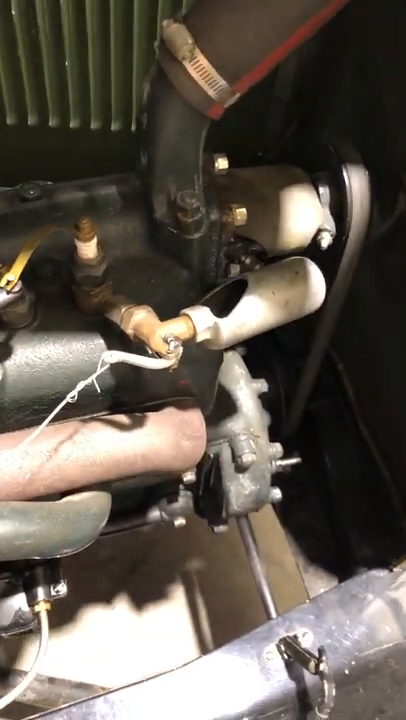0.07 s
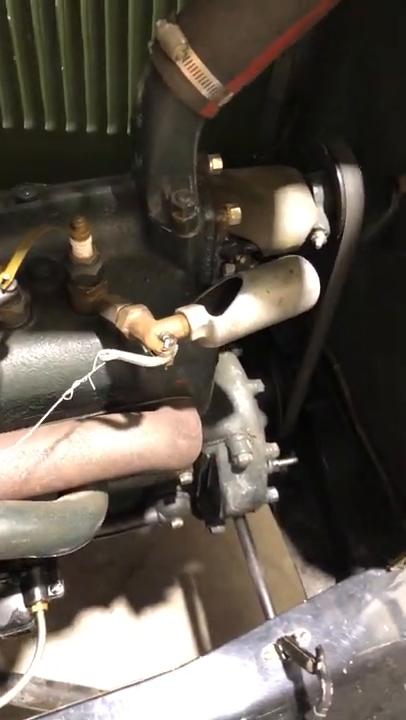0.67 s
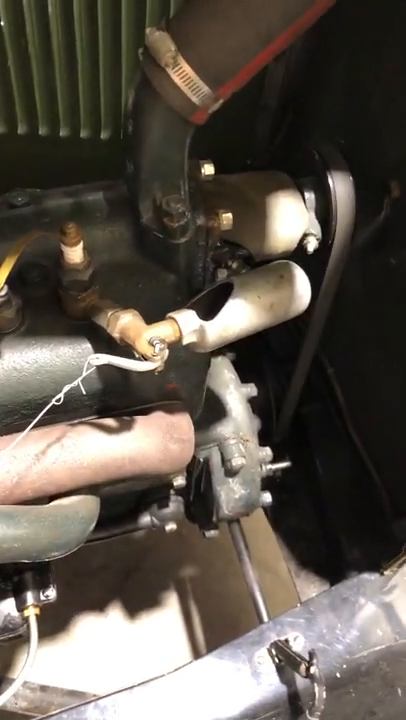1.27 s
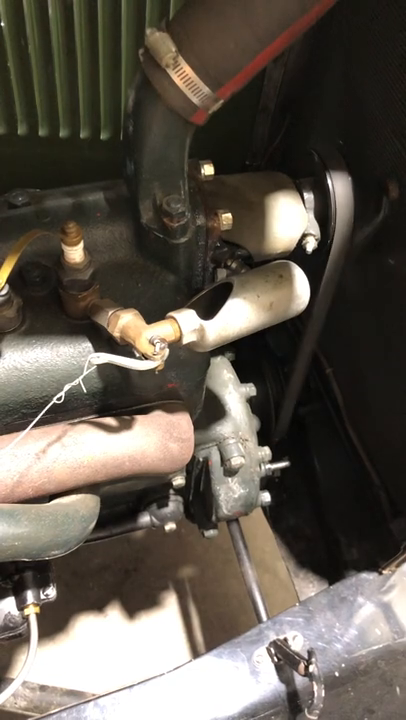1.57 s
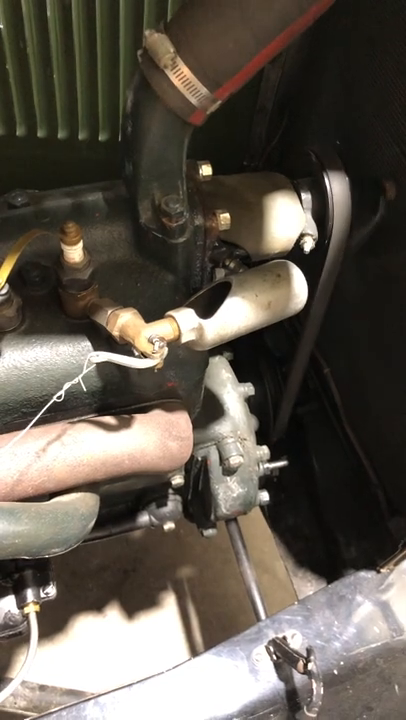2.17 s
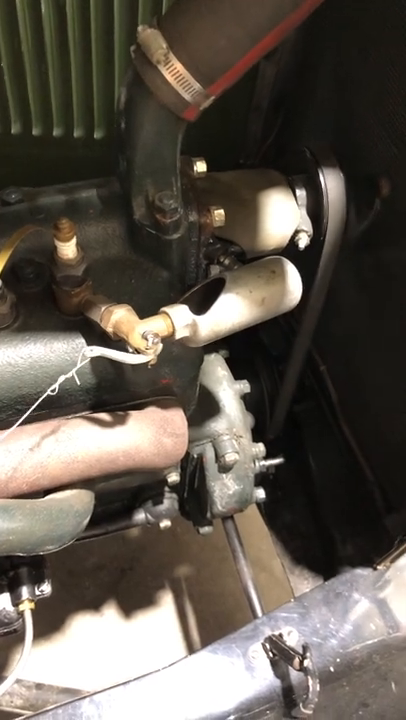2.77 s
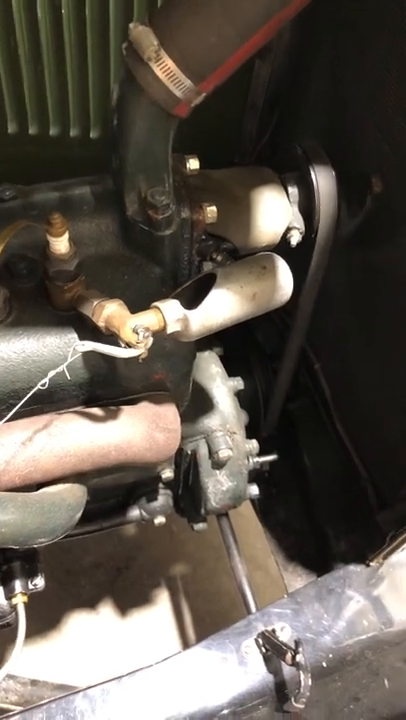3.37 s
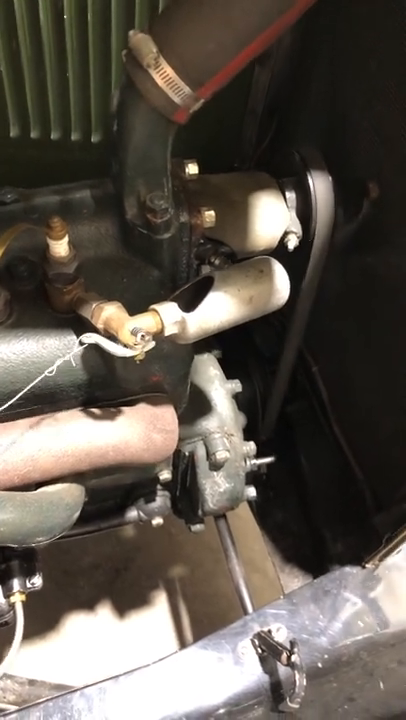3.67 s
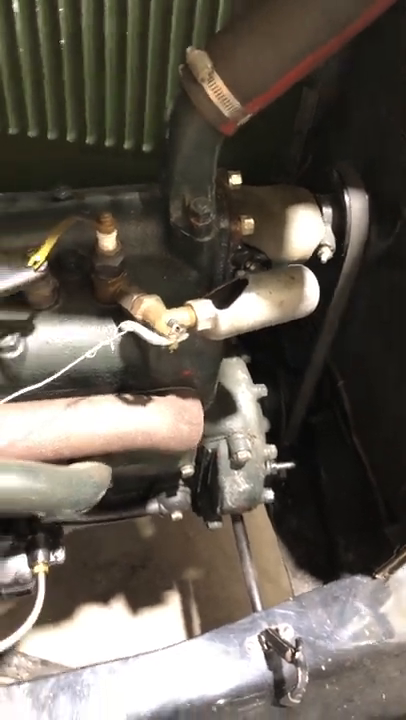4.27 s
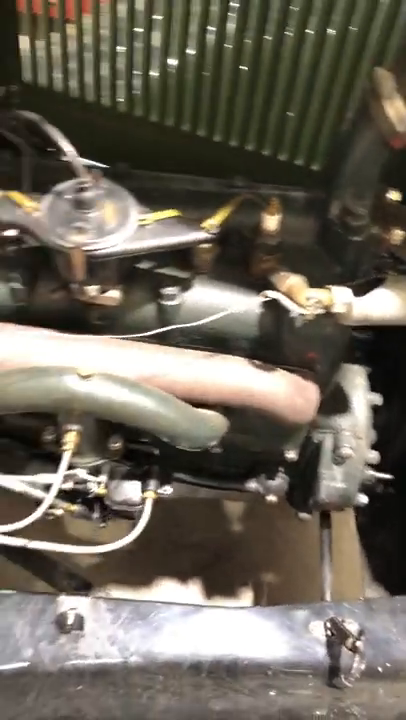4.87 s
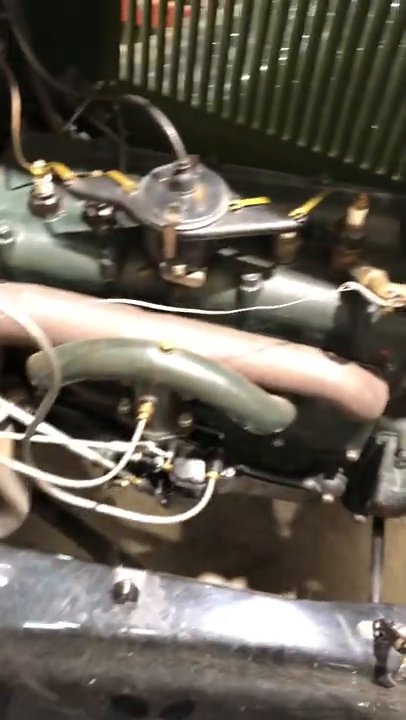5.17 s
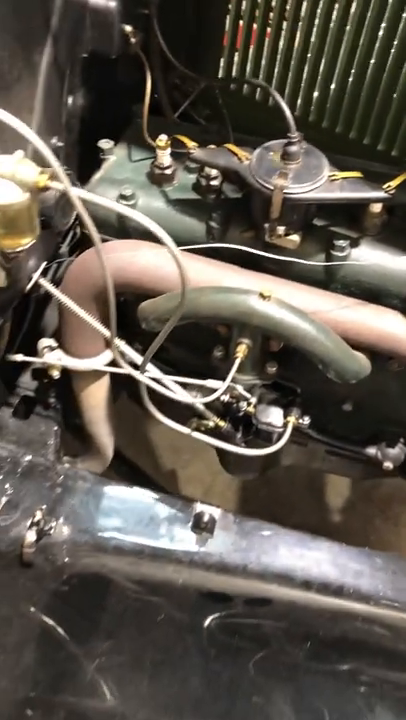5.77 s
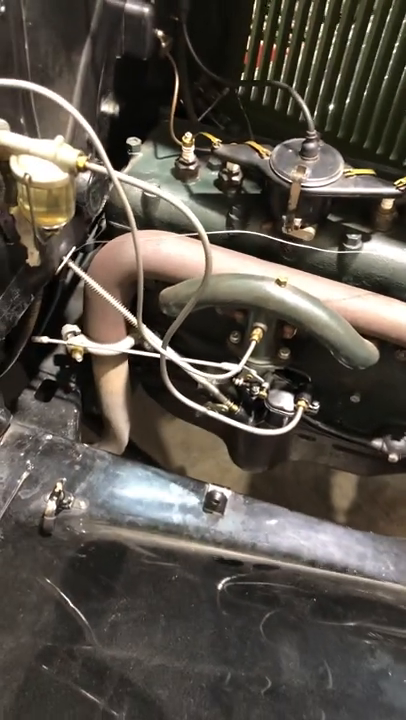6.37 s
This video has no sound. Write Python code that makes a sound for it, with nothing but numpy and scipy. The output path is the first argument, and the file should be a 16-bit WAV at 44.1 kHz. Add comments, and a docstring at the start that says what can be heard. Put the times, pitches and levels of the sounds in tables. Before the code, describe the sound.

Rapid, piercing toots, each with a spit of hiss, come from a whistle on an idling old car engine and ring briefly around a garage. Low thuds and light ticking run underneath. After about three and a half seconds the toots cut off, and the engine carries on a touch quicker, whirring and clacking, growing louder at the close microphone.

```python
"""An old four-cylinder car engine idles in a garage, with a compression whistle screwed into one cylinder. At
first that cylinder blows a hissing toot once every engine cycle, and the walls throw it back. At 3.6 seconds
the whistle's valve is shut. The engine thuds and ticks on, a little faster, and two of the tappet ticks in each
cycle knock out loudly. The clatter swells as the close microphone moves along the engine and the automatic
volume control, no longer held down by the toots, turns back up."""
import sys
import numpy as np
from scipy import signal
from scipy.fft import rfft, irfft
from scipy.io import wavfile
from scipy.ndimage import uniform_filter1d, minimum_filter1d

SR = 44100
rng = np.random.default_rng(int(sys.argv[2]) if len(sys.argv) > 2 else 0)


def materialize(psi):
    """Save the field psi as 16-bit PCM at rate SR to the path in sys.argv[1].

    A 1-D psi becomes a single channel; in a 2-D psi each row is a channel.
    """
    bounded = np.clip(np.atleast_2d(psi).T, -1, 1)
    quanta = np.round(bounded * 32767).astype(np.int16)
    wavfile.write(sys.argv[1], SR, quanta)


N = 287973
T = np.arange(N) / SR
VALVE_SHUT_S = 3.6  # the whistle stops here
# The tone of metal hitting metal. Each row: frequency in Hz, relative level in dB.
METAL_TONE = [(500, -2.5), (1500, -5.5), (2600, -3), (4000, 2.5), (5200, 0), (7500, -0.5), (9500, -0.5),
              (11500, -5.5), (15800, -10)]


def undb(db):
    """Turn decibels into a number to multiply by."""
    return 10 ** (np.asarray(db) / 20)


def add(out, start_s, x):
    """Mix x into out, beginning at start_s."""
    i = int(round(start_s * SR))
    a, b = max(i, 0), min(i + len(x), len(out))
    if b > a:
        out[a:b] += x[a - i:b - i]


def colour(x, tone, peaks=()):
    """Give x a smooth tone curve with ringing peaks on top, at an average (rms) level of 1."""
    f = np.fft.rfftfreq(len(x), 1 / SR) + 1e-3
    hz, db = np.transpose(tone)
    gain = undb(np.interp(np.log(f), np.log(hz), db)) / np.sqrt(1 + (20 / f) ** 4)
    for centre, width, rise in peaks:
        gain = gain * (1 + (undb(rise) - 1) / np.sqrt(1 + (2 * (f - centre) / width) ** 4))
    shaped = irfft(rfft(x) * gain, len(x))
    return shaped / np.sqrt(np.mean(shaped ** 2))


def noise(tone, peaks=()):
    """Steady noise with the given tone."""
    return colour(rng.standard_normal(N), tone, peaks)


def bursts(times, levels_db, rise_s, fall_s, hold_s=0):
    """A loudness curve that peaks at each given time, holds and dies away."""
    t = np.arange(-SR // 50, SR // 10) / SR
    shape = np.exp(np.minimum(t / rise_s, -np.maximum(t - hold_s, 0) / fall_s))
    power = np.zeros(N)
    for s, db in zip(times, levels_db):
        add(power, s + t[0], (undb(db) * shape) ** 2)
    return np.sqrt(power)


def cycle_starts():
    """The start time of every engine cycle: the idle drifts a little, then quickens."""
    # The turning crankshaft. Each row: time in seconds, cycles since the first toot.
    crank = [(-.0495, 0), (.9445, 7), (1.368, 10), (1.513, 11), (2.247, 16), (2.397, 17), (2.6915, 19),
             (3.56, 25), (4.003, 28), (5.585, 39), (6.698, 47)]
    s, cycles = np.transpose(crank)
    return np.interp(np.arange(cycles[-1] + 1), cycles, s)


def strokes(starts, place):
    """The times when the engine passes one place (0 to 1) in its cycle."""
    return starts[:-1] + place * np.diff(starts)


def garage(x, tail_db=-25.0, die_away_s=1.24, build_s=0.088):
    """The sound arrives directly, then as a few echoes, then as a blurred tail."""
    # Echoes off bonnet, floor and walls. Each row: delay in seconds, level in dB.
    echoes = [(.007822, -23), (.011752, -24), (.013049, -21), (.022528, -22), (.046608, -23.5),
              (.084012, -38)]
    t = np.arange(SR) / SR
    tail = colour(rng.standard_normal(SR), [(100, 17), (1000, 3.0), (5000, -8), (15000, -23.5)])
    tail = tail * undb(-60 * t / die_away_s) * (1 - np.exp(-(t / build_s) ** 4))
    response = undb(tail_db) * tail / np.sqrt(np.sum(tail ** 2))
    response[0] += 1  # the direct sound
    for delay_s, db in echoes:
        response[int(round(delay_s * SR))] += undb(db)
    return signal.fftconvolve(x, response)[:len(x)]


def rumble(starts, rumble_db=-48.5, ring_s=0.033, push_s=0.0031, scatter=1.26):
    """Four thuds a cycle shake the engine block and car body, over a low hum."""
    # The cylinders. Each row: place in the cycle, relative dB with the whistle open, then with it shut.
    cylinders = [(.03, 0, 4.5), (.28, -0.5, 1.5), (.55, 0.5, 1), (.78, 1, 0)]
    # The engine's hum. Each row: vibrations per cycle, level in dB.
    hum_tones = [(8, -70.5), (12, -66)]
    # The deep tone of the thuds. Each row: frequency in Hz, relative level in dB.
    thud_tone = [(25, -24), (50, -17), (75, -1), (108, -2), (160, -0.5), (235, -2), (290, 1), (400, -5.5),
                 (550, -19.5), (780, -21), (1300, -70)]
    # Ringing of block and body panels. Each row: frequency in Hz, width in Hz, boost in dB.
    body_peaks = [(137, 18, 1.5), (188, 46, 4.5), (326, 31, 4)]
    t = np.arange(SR // 6) / SR
    shape = np.exp(-t / ring_s) * (1 - np.exp(-t / push_s))
    thuds = np.zeros(N)
    for place, open_db, shut_db in cylinders:
        own_thud = rng.standard_normal(len(t))  # each cylinder has its own sound
        for s in strokes(starts, place):
            db = open_db if s < VALVE_SHUT_S else shut_db
            add(thuds, s, undb(db) * shape * (own_thud + scatter * rng.standard_normal(len(t))))
    phase = 2 * np.pi * np.interp(T, starts, np.arange(len(starts)))
    hum = sum(undb(db) * np.sqrt(2) * np.sin(round(k) * phase + rng.uniform(0, 2 * np.pi))
              for k, db in hum_tones)
    return undb(rumble_db) * colour(thuds, thud_tone, body_peaks) + hum


def rattle(starts, whirr_db=-47.0, tappet_db=-2, scatter_db=3.0, grain_db=2.5):
    """Tappets, the parts that push the valves, tick over the grainy whirr of gears, belt and fan."""
    # The ticks. Each row: place in the cycle, relative level in dB.
    tappets = [(0.037, -40.5), (.31, -43), (0.553, -40), (0.796, -38)]
    # The tone of the whirr. Each row: frequency in Hz, relative level in dB.
    whirr_tone = [(260, -23), (450, -5), (804, 2.5), (1050, -3.5), (1170, -1.5), (1370, -3), (1720, 0.5),
                  (1970, -5.5), (3960, -5), (4950, -9.5), (8450, -10), (10700, -15.5), (15100, -14),
                  (15800, -33)]
    times = np.concatenate([strokes(starts, place) for place, _ in tappets])
    levels = np.repeat([db for _, db in tappets], len(starts) - 1)
    levels = levels + scatter_db * rng.standard_normal(len(times))
    ticks = bursts(times, levels + tappet_db, rise_s=0.0046, fall_s=0.0072) * noise(METAL_TONE)
    grain_times = T[::SR // 300]  # the whirr's level flickers 300 times a second
    grains = np.interp(T, grain_times, rng.standard_normal(len(grain_times)))
    whirr = colour(rng.standard_normal(N) * undb(grain_db * grains), whirr_tone)
    return ticks + undb(whirr_db) * whirr


def clacks(starts, clack_db=-1, scatter_db=-0.1):
    """Metal knocks die quickly in the iron block: two a cycle after the toots, and a few harder ones."""
    # Two tappets that knock out loudly. Each row: place in the cycle, relative level in dB.
    loud_tappets = [(.048, -36.5), (0.778, -34.5)]
    # They grow as the microphone leaves the whistle. Each row: time in seconds, level change in dB.
    swell = [(3.7, -39), (4.0, -5.5), (4.75, 1)]
    # Single harder knocks. Each row: time in seconds, relative level in dB.
    hard_knocks = [(3.969, -29), (4.549, -28), (5.521, -25), (5.591, -29)]
    # Ringing of the iron. Each row: frequency in Hz, width in Hz, boost in dB.
    iron_peaks = [(3180, 110, 4), (3940, 280, 0.5), (5500, 160, 4.5), (6800, 1200, 1.5)]
    shut_starts = starts[starts > VALVE_SHUT_S]
    regular = [(s, db + np.interp(s, *np.transpose(swell)) + scatter_db * rng.standard_normal())
               for place, db in loud_tappets for s in strokes(shut_starts, place)]
    times, levels = np.transpose(regular + hard_knocks)
    return bursts(times, levels + clack_db, rise_s=0.0018, fall_s=0.008) * noise(METAL_TONE, iron_peaks)


def jet(starts, jet_db=-21, fade_db_per_s=0.48, scatter_db=1.15, leak_db=-51, leak_hz=14900):
    """Gas spits across the whistle's lip with each toot, and hisses through the open valve in between."""
    # The tone of the rushing gas. Each row: frequency in Hz, relative level in dB.
    gas_tone = [(30, 5.5), (150, -3.5), (500, -7.5), (1300, -3.5), (2100, -3.5), (3500, 0.5), (5000, -4.5),
                (6800, 5.5), (9500, -0.5), (15800, -0.5)]
    # Ringing of the whistle pipe. Each row: frequency in Hz, width in Hz, boost in dB.
    pipe_peaks = [(986, 227, 20), (1686, 99, 10), (2560, 250, 12), (3220, 200, 0.5), (3853, 230, 10.5),
                  (4390, 110, 6)]
    times = starts[starts < VALVE_SHUT_S]
    spit_db = jet_db - fade_db_per_s * times + scatter_db * rng.standard_normal(len(times))
    spit = bursts(times + 0.0034, spit_db, rise_s=0.0033, fall_s=0.0052, hold_s=0.0057)
    leak = bursts(times[:-1] + 0.093, np.full(len(times) - 1, leak_db), rise_s=.016, fall_s=0.14)
    rush = noise(gas_tone, pipe_peaks)
    thin_hiss = noise([(100, 0), (16000, 0)], [(leak_hz, 900, 35)])
    return spit * rush + leak * thin_hiss


def blips(starts, place=0.45, faint_db=-22, scatter_db=3):
    """Times and levels of the small peeps made as the piston pushes out the exhaust; most are faint."""
    # The peeps that sound clearly. Each row: start in seconds, level in dB.
    clear_blips = [(.027, -11), (.170, -9.5), (.451, -12.5), (1.020, -8.5), (1.161, -14), (1.303, -11),
                   (1.884, -13.5), (3.346, -10.5)]
    times = strokes(starts[starts < VALVE_SHUT_S], place)
    levels = faint_db + scatter_db * rng.standard_normal(len(times))
    for s, db in clear_blips:
        nearest = np.argmin(np.abs(times - s))
        times[nearest], levels[nearest] = s, db
    return zip(times, levels)


def toot(hz, blow_s, rise_s=0.0058, fall_s=0.0059, scoop_hz=290, scoop_s=0.0031, sag_hz_per_s=2995):
    """The pipe's note starts low, slides up, then sags and fades as the cylinder empties."""
    t = np.arange(SR // 12) / SR
    loudness = (1 - np.exp(-(t / rise_s) ** 3)) / (1 + np.exp((t - blow_s) / fall_s))
    pitch_hz = hz - scoop_hz * np.exp(-t / scoop_s) - sag_hz_per_s * t
    phase = 2 * np.pi * np.cumsum(pitch_hz) / SR
    note = undb([0, -29, -39]) @ np.sin(np.outer([1, 2, 3], phase))  # with two faint overtones
    return loudness * note


def whistle(starts, pipe_hz=947.8, waver_hz=2, toot_db=4, blow_s=0.012, blow_scatter=0.08):
    """The cylinder blows a strong toot and a weaker, higher blip each cycle until the valve is shut."""
    lead = SR // 2  # extra room, as the first toot comes just before time zero
    out = np.zeros(lead + N)
    times = starts[starts < VALVE_SHUT_S]
    for s, (waver, stretch) in zip(times, rng.standard_normal((len(times), 2))):
        length_s = blow_s * (1 + blow_scatter * stretch)
        if s == times[-1]:
            length_s = 0.0059  # the closing valve cuts the last toot short
        add(out, s + lead / SR, undb(toot_db) * toot(pipe_hz + waver_hz * waver, length_s))
    for s, db in blips(starts):
        add(out, s + lead / SR, undb(db) * toot(hz=1010, blow_s=0.0055, fall_s=0.0032))
    return garage(out)[lead:]


def scene():
    """The engine and its whistle, together in the garage."""
    # The microphone moves along the engine, and at the very end the engine surges as it revs. Each row: time in
    # seconds, rumble and rattle changes in dB.
    level_path = [(0, 3.5, 2.5), (1.8, 1.3, 1.3), (3.85, 0, 0), (4.8, -1, 0.7), (5.3, -1, 1),
                  (6.42, -2.5, 1.5), (6.5, 2, 3)]
    starts = cycle_starts()
    times, *changes_db = np.transpose(level_path)
    rumble_gain, rattle_gain = (undb(np.interp(T, times, db)) for db in changes_db)
    engine = rumble_gain * rumble(starts) + rattle_gain * rattle(starts) + clacks(starts)
    return (whistle(starts) + garage(jet(starts) + engine))[None]


def record(dry, hold_s=0.25, recover_db_per_s=5.5, ceiling_db=-3.5, release_db_per_s=300, top_hz=15900):
    """The volume control creeps up once loud peaks stop coming; a fast limiter flattens each toot."""
    x = dry[0]
    loud = np.abs(x) > .35
    quiet_s = T - np.maximum.accumulate(T * loud)  # time since the last loud peak
    x = x * undb(np.clip(recover_db_per_s * (quiet_s - hold_s), 0, 20))
    # The limiter turns down whatever passes the ceiling, then quickly lets go.
    peak = -minimum_filter1d(-np.abs(x), size=50)
    over_db = np.maximum(20 * np.log10(peak + 1e-9) - ceiling_db, 0)
    cut_db = np.maximum.accumulate(over_db + release_db_per_s * T) - release_db_per_s * T
    x = x * undb(-uniform_filter1d(cut_db, size=40))
    treble_cut = signal.ellip(12, .1, 80, top_hz, fs=SR, output="sos")
    return signal.sosfilt(treble_cut, x)[None]


dry = scene()
out = record(dry)
materialize(out)
```